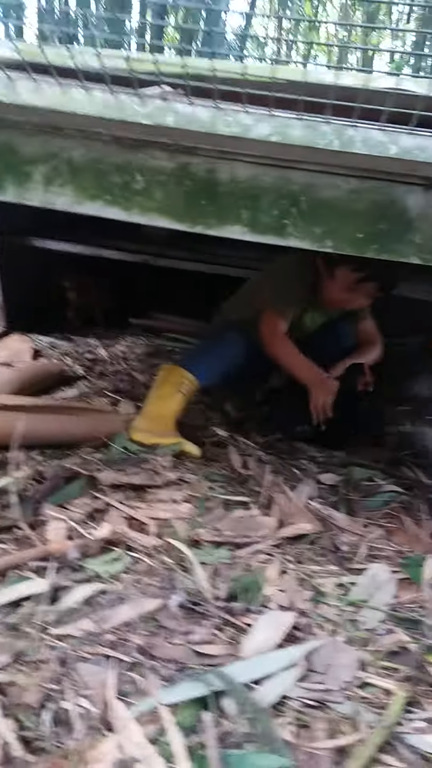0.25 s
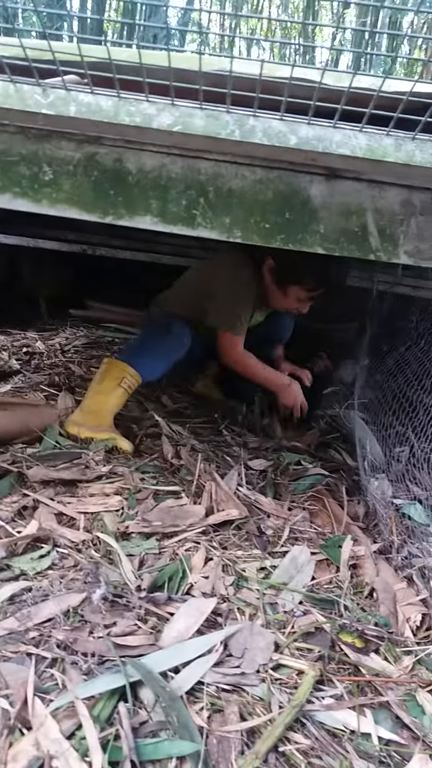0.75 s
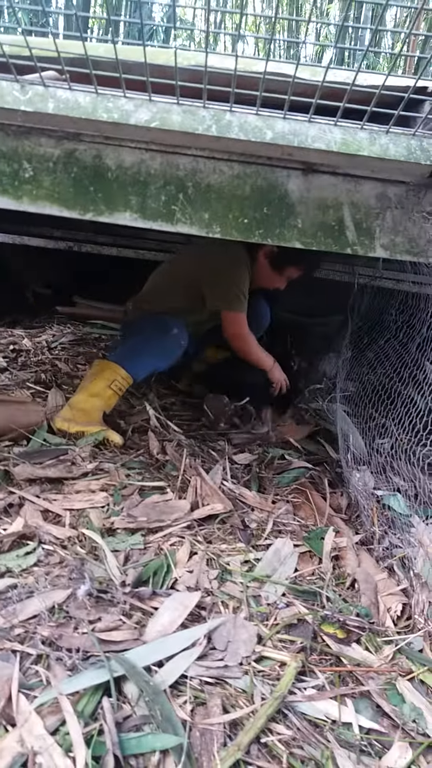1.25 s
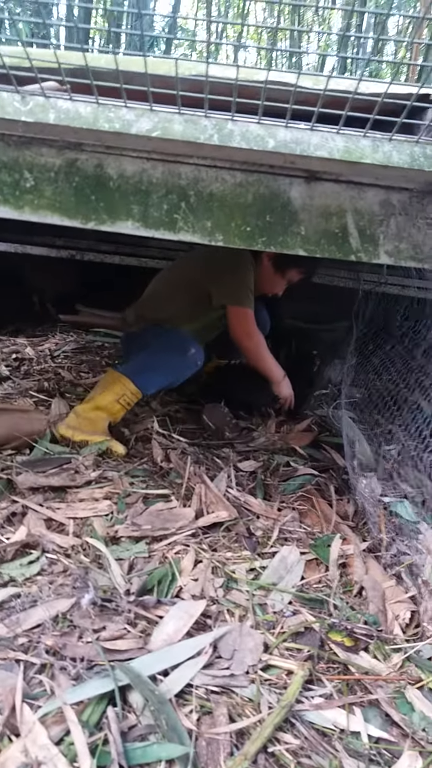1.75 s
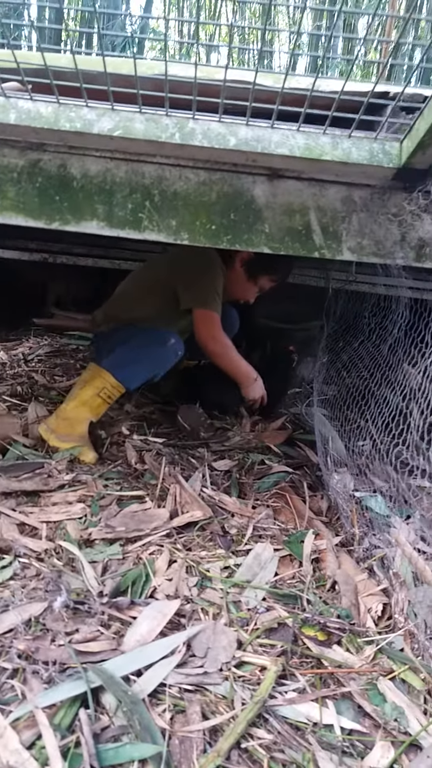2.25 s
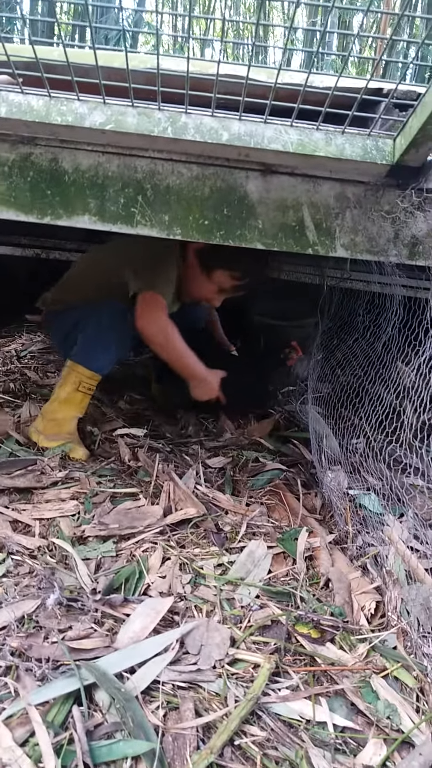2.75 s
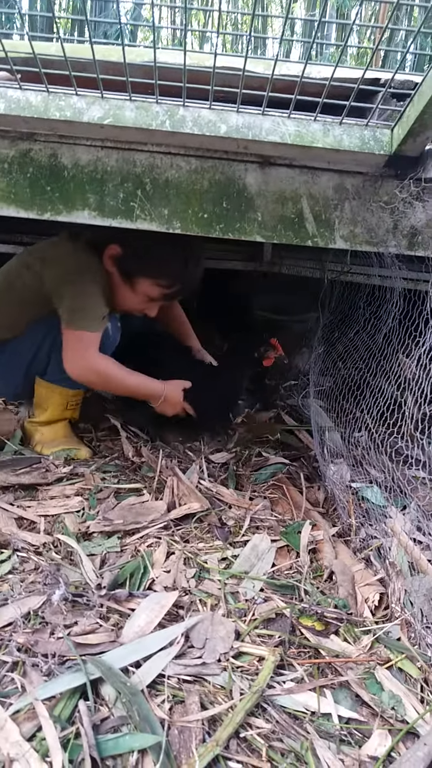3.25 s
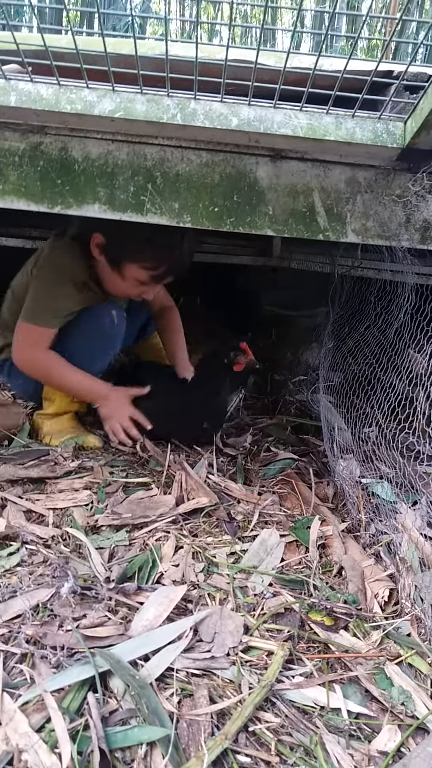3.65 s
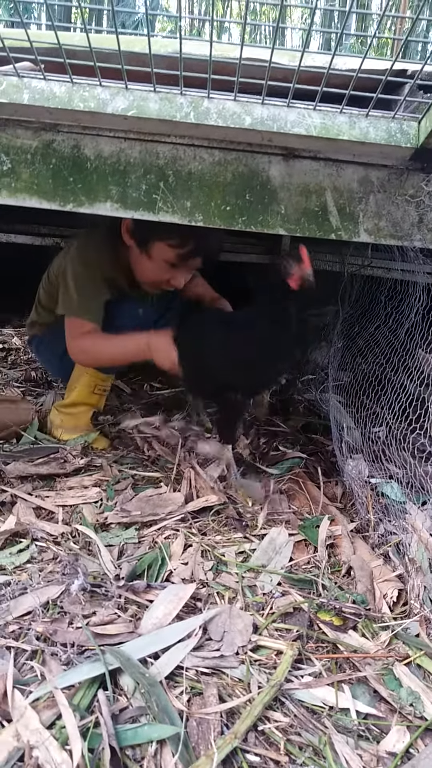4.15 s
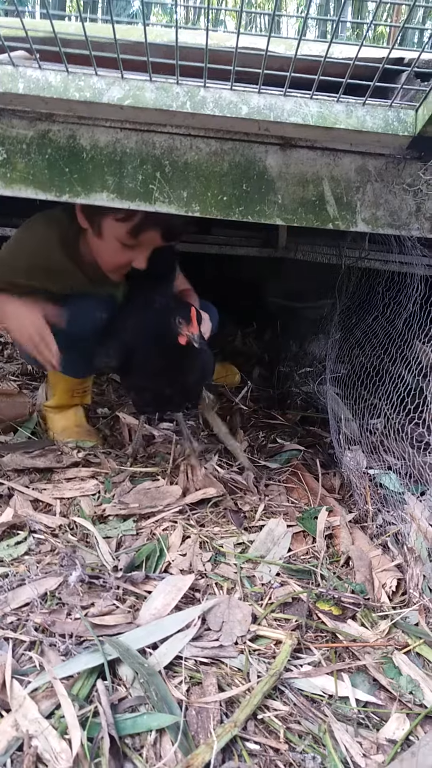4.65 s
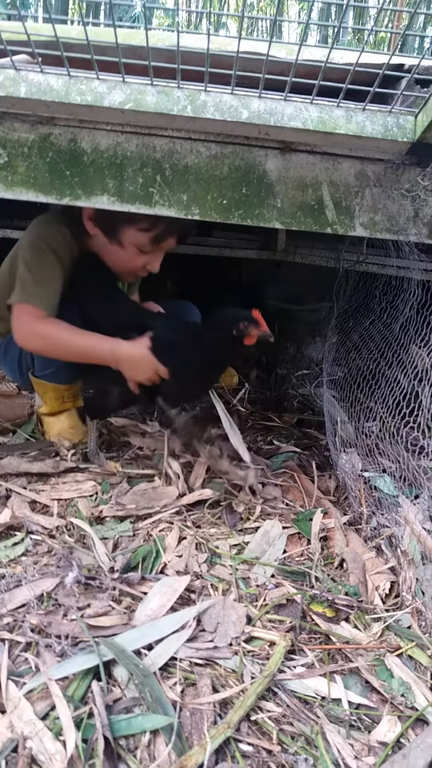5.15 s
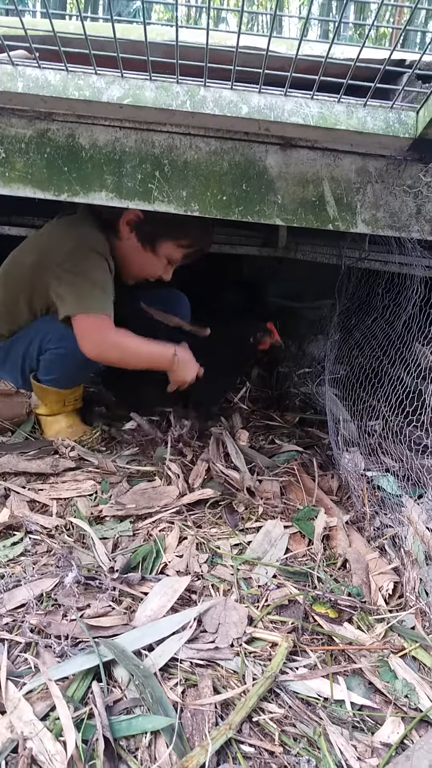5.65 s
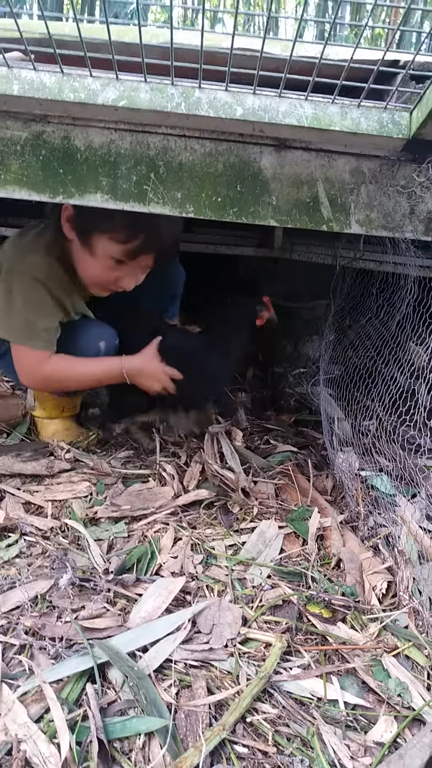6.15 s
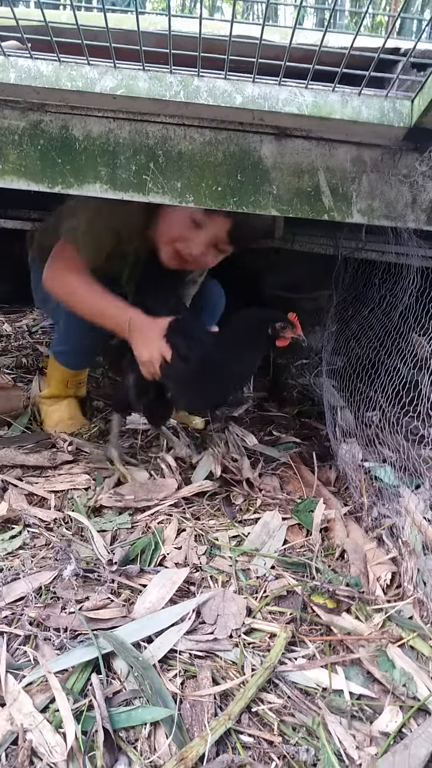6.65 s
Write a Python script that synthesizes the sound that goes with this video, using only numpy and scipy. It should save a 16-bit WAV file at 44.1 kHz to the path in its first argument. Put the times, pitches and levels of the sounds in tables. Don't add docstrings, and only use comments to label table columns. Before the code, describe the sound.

A hen being grabbed cries out sharply at once, already mid-squawk, then sounds tired and raspy with quiet gaps. A burst of harsh barks and one more clear squawk follows after four seconds, trailing into broken muttering. Leaf litter crackles under feet and hands, faint birds glide downward in pitch, low clucks sit behind. Near, essentially mono outdoor pickup, with a short dull boxy echo from the boards.

```python
import sys
import numpy as np
from scipy import signal
from scipy.fft import rfft, irfft, next_fast_len
from scipy.io import wavfile
from scipy.ndimage import uniform_filter1d

SR = 44100
rng = np.random.default_rng(int(sys.argv[2]) if len(sys.argv) > 2 else 0)


def dump(signal):
    limited = np.clip(np.atleast_2d(signal).T, -1, 1)
    pcm = np.round(limited * 32767).astype(np.int16)
    wavfile.write(sys.argv[1], SR, pcm)


def decibels_to_gain(level_db):
    exponent = np.asarray(level_db, float) / 20
    return 10 ** exponent


N = 304290


def rms_one(x):
    return x / np.sqrt(np.mean(x ** 2) + 1e-20)


def coloured(x, points):
    size = next_fast_len(len(x))
    hz = np.maximum(np.fft.rfftfreq(size, 1 / SR), 1)
    points = np.array(points)
    gain_db = np.interp(np.log(hz), np.log(points[:, 0]), points[:, 1])
    return irfft(rfft(x, size) * decibels_to_gain(gain_db), size)[:len(x)]


def drift(count, rate_hz):
    r = np.exp(-2 * np.pi * rate_hz / SR)
    slow = signal.lfilter([1], [1, -2 * r, r * r], rng.standard_normal(count + SR // 4))
    return rms_one(slow)[SR // 4:]


def resonance(x, hz, width_hz):
    r = np.exp(-np.pi * width_hz / SR)
    zeros = np.array([1, 0, -1]) * (1 - r * r) / 2
    return signal.lfilter(zeros, [1, -2 * r * np.cos(2 * np.pi * hz / SR), r * r], x)


def steep_resonance(x, hz, width_hz):
    return resonance(resonance(x, hz, width_hz), hz, width_hz)


def band(x, low_hz, high_hz):
    return signal.sosfilt(signal.butter(2, [low_hz, high_hz], "band", fs=SR, output="sos"), x)


def add(out, s, sound):
    i = max(round(s * SR), 0)
    out[i:i + len(sound)] += sound[:N - i]


def hump(length_s, rise):
    u = np.arange(round(length_s * SR)) / (length_s * SR)
    rise = np.clip(rise, .02, .9)
    return np.sin(np.pi / 2 * np.minimum(u / rise, (1 - u) / (1 - rise))) ** 2


def tract(source, modes):
    out = 0
    for k, (hz, width_hz, level_db) in enumerate(modes):
        gain = decibels_to_gain(level_db + 2.7 * drift(len(source), 21.3))
        out = out + (-1) ** k * gain * resonance(resonance(source, hz, width_hz), hz, 2 * width_hz)
    return out


def opened(modes, gains_db):
    return [(hz, width_hz, db + more_db) for (hz, width_hz, db), more_db in zip(modes, gains_db)]


# centre in Hz, width in Hz, level in dB.
SHRILL_MODES = [(7990, 1100, 3.5), (9700, 2500, -11), (13000, 1900, -30)]
OPEN_HZ, THROAT_WIDTH_HZ, CLOSED_WIDTH_HZ = 1486, 370, 312
THROB_HZ, SHARP_CUT_HZ = 53, 8200
TOP_AIR = .12


def squawk(rows, rough, throb, fundamental_db, windpipe_db, sharp_db, windpipe, sharp, shrill_db,
           closed_hz, air, spread, top_lag):
    s, pitch, level_db, open_db = np.transpose(rows)
    t = np.arange(s[0], s[-1], 1 / SR)
    level_db, open_db = np.interp(t, s, level_db), np.interp(t, s, open_db)
    below_peak_db = level_db.max() - level_db
    rough = np.clip(rough + (0.0061 + 0.047 * rough) * below_peak_db, 0, 1)
    glide = uniform_filter1d(np.interp(t, s, pitch), size=500)
    jitter = 1 + 0.0718 * rough * drift(len(t), 143.0) + 0.0028 * drift(len(t), 59.0)
    cycles = np.cumsum(glide * jitter) / SR
    pulses = sum(np.cos(2 * np.pi * k * cycles - .45 - spread * k ** 2) for k in range(1, 29))
    luck = np.clip(rng.standard_normal(int(cycles[-1]) + 2), -3, 1.3)
    strength = decibels_to_gain(5.0 * rough * luck[(cycles + .5).astype(int)])
    breath = rng.standard_normal(len(t)) * (1 + np.cos(2 * np.pi * cycles))
    source = rms_one(pulses) * strength + 1.25 * rough * breath
    upper = source + air * breath
    hissing = upper + TOP_AIR * decibels_to_gain(4.5 * drift(len(t), 25.0)) * breath
    lowest_top_hz = 1.35 * pitch.max()
    layers = [band(band(source, 230, lowest_top_hz), 230, lowest_top_hz),
              steep_resonance(source, closed_hz, CLOSED_WIDTH_HZ),
              steep_resonance(source, OPEN_HZ, THROAT_WIDTH_HZ),
              tract(upper, windpipe),
              band(tract(hissing, sharp), 2500, SHARP_CUT_HZ),
              tract(hissing, SHRILL_MODES),
              band(breath, 192, 284)]
    rest = np.maximum(1 - sum(decibels_to_gain(2 * db) for db in (open_db, fundamental_db)), .03)
    forced = np.minimum(decibels_to_gain(3 * (sharp_db + 13)) + 3 * rough.min(), 1)
    shrill = decibels_to_gain(sharp_db + shrill_db - 8.5) * forced
    loudest_db = np.maximum.accumulate(level_db)
    wait_db = level_db.max() - loudest_db
    lead = decibels_to_gain(0.38 * wait_db)
    fading = lead * decibels_to_gain(0.82 * (level_db - loudest_db))
    top = fading * decibels_to_gain(-top_lag * wait_db)
    gains = [decibels_to_gain(fundamental_db) * lead, -np.sqrt(rest), decibels_to_gain(open_db), -decibels_to_gain(windpipe_db) * fading,
             decibels_to_gain(sharp_db) * top, shrill * top, decibels_to_gain(-17) * rough]
    voice = sum(g * rms_one(x) for g, x in zip(gains, layers))
    beat = np.cos(2 * np.pi * THROB_HZ * (t - s[0] - .008) + 0.96 * drift(len(t), 37.0))
    throbbing = rms_one(np.maximum(1 + 0.75 * throb * beat, .06))
    edge = np.minimum(1, np.minimum(t - s[0] + (s[0] == 0), s[-1] - t) / 0.0023)
    return -voice * decibels_to_gain(level_db) * edge * throbbing


# time in seconds, pitch in Hz, level in dB,
# open-beak resonance in dB against the level.
CLEAR_CALLS = [
    [(0, 535, -17, -2.5), (0.05, 534.4, -19, 2), (0.095, 551.4, -18, -3.5), (0.11, 523, -23.5, 2.5),
     (0.124, 429, -25.5, -20), (0.14, 390, -67, -5)],
    [(0.236, 491.4, -42, -7), (0.246, 542, -18, -3), (0.268, 550.3, -15.5, -3), (0.295, 528.5, -16.5, 0),
     (0.318, 465, -23.5, -4), (0.342, 416, -42, -21)],
    [(0.44, 514, -66, 4), (0.456, 553, -25, -4.5), (0.48, 567, -20, 1.5), (0.51, 573.4, -21, -0.5),
     (0.535, 524, -25.5, -5.5), (0.558, 411, -38.5, -25)],
    [(0.656, 499.5, -44, -11), (0.672, 547.4, -31.5, 2.5), (0.692, 532, -22.5, 5), (0.71, 520, -26, -5.5),
     (0.762, 510.3, -24, 2), (0.788, 480, -35.5, -11)],
    [(4.612, 465, -48, -8), (4.62, 473, -36.5, -38), (4.655, 492, -18.5, -44), (4.685, 504.5, -22, -13),
     (4.712, 496.4, -23.5, -2), (4.726, 482, -30.5, -14), (4.742, 437, -33, -19)],
]
# roughness 0-1, throb depth 0-1, fundamental in dB, windpipe in dB,
# sharp top in dB.
CLEAR_COLOUR = [(0.07, 0, -8.5, -2, -4), (0.17, 0.4, -9.5, -5.5, -7), (0.07, 0.14, -4, -4.5, -6),
                (0.06, 0.02, -3, -8, -13), (0, 0.04, -14, -12.5, -14)]
# three windpipe gains in dB,
# three sharp gains in dB, shrill in dB, closed-beak resonance in Hz.
CLEAR_OPENINGS = [(5.5, -3, 0.22, -2, -0.7, 0, 1, 1060), (7.5, 2.5, 0.2, -4, -5.5, 2, 1, 1037),
                  (-2, -3.5, 0.74, -0.5, -7, 1, 1, 960), (-15, 5, 1, -14, 2, -2, 3.5, 1090),
                  (10, -2.5, 1.8, 10, 8, 0.43, -21, 1036)]
CLEAR_TOP_WAIT = [.57, .57, 0.57, 0.81, .05]
# centre in Hz, width in Hz, level in dB.
CLEAR_WINDPIPE = [(2200, 500, -4), (2680, 1000, -1.5), (3770, 770, 1)]
# centre in Hz, width in Hz, level in dB.
CLEAR_SHARP = [(4240, 1200, 5.5), (5430, 1120, 4.5), (6920, 1060, 4.5)]


def clear_squawks():
    out = np.zeros(N)
    for rows, colour, opening, top_lag in zip(CLEAR_CALLS, CLEAR_COLOUR, CLEAR_OPENINGS, CLEAR_TOP_WAIT):
        *gains_db, shrill_db, closed_hz = opening
        windpipe, sharp = opened(CLEAR_WINDPIPE, gains_db[:3]), opened(CLEAR_SHARP, gains_db[3:])
        add(out, rows[0][0], squawk(rows, *colour, windpipe, sharp, shrill_db, closed_hz,
                                    air=.07, spread=0.12, top_lag=top_lag))
    return out


ONSET_OVERSHOOT = 0.057
BEAK_AT_START, BEAK_AT_END = 0.94, 0.89


def call(start_s, length_s, hz, peak_db, open_db, breath):
    attack_s, release_s, droop, start_db, end_db, sag = breath
    hold_s = max(length_s - attack_s - release_s, .001)
    s = np.array([0, attack_s, attack_s + hold_s, max(length_s, attack_s + hold_s + .005)])
    pitch = hz * (1 + ONSET_OVERSHOOT * (s == 0)) - sag * (s - length_s / 2)
    level_db = peak_db - droop * hold_s * np.array([0, 0, 1, 1]) + [start_db, 0, 0, end_db]
    beak_db = open_db * np.array([BEAK_AT_START, 1, 1, BEAK_AT_END])
    return np.transpose([start_s + s, pitch, level_db, beak_db])


# start in seconds, length in seconds, pitch in Hz, peak in dB, open beak in dB.
TIRED_CALLS = [
    (0.958, 0.057, 520.7, -34, -4.5),
    (1.279, 0.16, 548.8, -33, -5),
    (1.658, 0.072, 492, -36.5, -4.5),
]
CHATTER_CALLS = [
    (2.743, 0.046, 458, -36.5, -1.5),
    (3.228, 0.035, 484.5, -35.5, 2),
    (3.323, 0.045, 510, -31, -5),
    (3.669, 0.043, 439.5, -29.5, -6),
    (4.016, 0.043, 397, -40, -6),
]
BARK_CALLS = [
    (4.164, 0.039, 512.6, -20, -15),
    (4.237, 0.044, 505.3, -19.5, -52),
    (4.31, 0.0468, 494, -23.5, -55),
    (4.495, 0.048, 475.3, -20.5, -4),
]
YAP_CALLS = [
    (4.898, 0.067, 461.6, -21.5, -7),
    (4.963, 0.063, 458, -24, -17),
    (5.265, 0.032, 432, -22, -3),
    (5.376, 0.066, 436, -28, -11.5),
]
MOAN_CALLS = [
    (4.533, 0.081, 402.5, -39, -42),
]
MUTTER_CALLS = [
    (5.331, 0.05, 418, -37.5, -5.5),
    (5.678, 0.062, 481.6, -27, -6),
    (5.773, 0.062, 430.3, -29, -12),
    (6.308, 0.049, 482, -34.5, -3.5),
    (6.386, 0.089, 500, -34.5, -4),
    (6.47, 0.055, 416, -34, 1),
]
RATTLE_CALLS = [
    (2.423, 0.101, 518.6, -42, -0.5),
    (2.528, 0.065, 490.5, -40.5, -5.5),
]
GROAN_CALLS = [
    (1.927, 0.078, 436.6, -42.5, -48),
    (3.792, 0.052, 405.4, -35, -15),
]
WHEEZE_CALLS = [
    (3.846, 0.14, 368, -48, -1.3),
    (6.536, 0.126, 384.4, -49.5, -1.4),
]
# roughness 0-1, throb depth 0-1, fundamental in dB, windpipe in dB at open beak,
# sharp top in dB.
KIND_VOICES = [
    (0.2, 0.39, -3, 1.5, -12),
    (0.64, 0.2, -3.5, -4.5, -24.5),
    (0.39, 0.15, -9.5, -13, -21.5),
    (0.62, 0.1, -6, -9.5, -22),
    (0.11, 0.05, 11, -19, -23),
    (0.47, 0.15, -4, -4, -21),
    (0.55, 0.2, -2, -6.5, -32),
    (0.79, 0.36, -9, -7.5, -20.5),
    (0.63, 0.63, -19, -46, -34),
]
# attack in seconds, release in seconds, hold droop in dB per second,
# start in dB, end in dB, pitch sag in Hz per second.
KIND_BREATHS = [(0.0123, 0.03, 68, -16, -11.5, 595), (0.011, 0.019, 45, -7, -21, 288),
                (0.0109, 0.013, -27, -10, -10.5, 489), (0.0086, 0.014, 38, -10, -14, 479),
                (0.006, 0.05, 54, -2, -15, 712), (0.0139, 0.025, 48, -5.5, -23.5, 398),
                (0.008, 0.023, 2, 1, -13, 294), (0.031, 0.038, 8.5, -18, -16, -200),
                (0.0085, 0.07, 43, -5, -5.5, 40)]
# windpipe in dB, sharp top in dB,
# closed-beak resonance in Hz.
NECK_POSTURE = [(1.5, 0, 720), (-2.5, 2.5, 970), (5.5, -0.5, 720), (-2.5, -6, 1010), (0, -7, 900),
                (0, -3, 940), (-0.5, 4.5, 940), (0.5, 2, 780), (1, -0.5, 960), (-1, -0.5, 985), (1, 2, 954),
                (1.5, 7, 895), (-1.5, 0.5, 1050), (-8, 5, 990), (-1.5, 2, 980), (3.5, -3.5, 897),
                (5, -2, 1100), (-8, -5, 940), (1.5, 4, 950), (0.5, -9, 970), (2.5, 3, 890), (1.5, -1, 880),
                (-2.5, 2, 690), (1.5, -6, 740), (-1, 4, 900), (-0.5, -7, 760), (-1, 2.5, 960), (0, 0, 550),
                (3, 2, 650)]
# windpipe high over low in dB, sharp high over low in dB,
# shrill in dB.
UPPER_LEAN = [(2, 2, 7), (3, 2.5, 0), (2, -2, 3), (-2, 0, -1.5), (-4, 0, -1.5), (-2.5, 0, 4),
              (-3.5, 0, 4.5), (5, 0, -1.5), (8, -6, -1), (4, 6, -1), (1.5, -2.5, -7), (7, -1, 3),
              (1, -5.5, 2), (8, -1.5, -2), (-1, -4, 1), (3.5, 0, 1), (-2, 1, 0), (2, 0, -1.5),
              (-1.5, -3, -1), (1.5, -1.5, 5), (-2, 2, 4), (-1, 6, -1.5), (-2, 5, -1.5), (-2, -2, -1.5),
              (-4, 0, -1.5), (-1, 0, -1.5), (3, 0, 3), (0, 0, -1.5), (0, 0, -1.5)]
# centre in Hz, width in Hz, level in dB.
HOARSE_TOP = [(4900, 1330, 0.5), (5700, 950, 1), (6570, 830, 0)]
# centre in Hz, width in Hz, level in dB.
HOARSE_PIPE = [(2335, 1180, -8), (2870, 1270, -3), (3695, 425, -1)]


def short_calls():
    out = np.zeros(N)
    kinds = [TIRED_CALLS, CHATTER_CALLS, BARK_CALLS, YAP_CALLS, MOAN_CALLS, MUTTER_CALLS, RATTLE_CALLS,
             GROAN_CALLS, WHEEZE_CALLS]
    necks = zip(NECK_POSTURE, UPPER_LEAN)
    for kind, voice, breath in zip(kinds, KIND_VOICES, KIND_BREATHS):
        rough, throb, fundamental_db, windpipe_db, sharp_db = voice
        air = .18 if kind is TIRED_CALLS else .48
        for row, (posture, lean) in zip(kind, necks):
            pipe_db, top_db, closed_hz = posture
            pipe_lean, sharp_lean, shrill_db = lean
            pipe_level_db = windpipe_db + pipe_db + 0.2 * row[-1]
            windpipe = opened(HOARSE_PIPE, [-pipe_lean, 0, pipe_lean])
            sharp = opened(HOARSE_TOP, [-sharp_lean, 0, sharp_lean])
            add(out, row[0], squawk(call(*row, breath), rough, throb, fundamental_db, pipe_level_db,
                                    sharp_db + top_db, windpipe, sharp, shrill_db, closed_hz,
                                    air=air, spread=0.027, top_lag=0.89))
    return out


# middle in seconds, length in
# seconds, change in dB.
THROAT_CATCHES = [(1.29, 0.032, -12), (1.367, 0.023, -7), (1.671, 0.016, -4.5), (0.957, 0.01, -4),
                  (2.433, 0.017, -14), (2.451, 0.015, -9), (2.471, 0.011, -9), (2.49, 0.012, -15),
                  (2.506, 0.012, -18), (2.529, 0.0092, -8), (2.543, 0.0093, -10), (2.56, 0.011, -14),
                  (4.181, 0.027, -4.5), (3.248, 0.0075, 2), (5.689, 0.0082, -2), (5.391, 0.011, 3),
                  (4.248, 0.0045, -8), (4.329, 0.015, -4), (4.521, 0.0097, -1), (4.916, 0.008, -3.5),
                  (4.944, 0.015, -3.5), (4.96, 0.0089, -5), (4.975, 0.0071, -9), (5.0, 0.0095, 1),
                  (5.424, 0.0086, -0.5), (5.707, 0.0072, 0), (5.786, 0.0075, -2), (3.338, 0.016, -7),
                  (5.266, 0.021, -2.5), (6.308, 0.015, -5), (6.405, .012, -6), (6.444, 0.0091, -16),
                  (6.476, 0.012, -7), (6.484, 0.018, -21)]


def catches():
    closure_db = np.zeros(N)
    for s, length_s, depth_db in THROAT_CATCHES:
        add(closure_db, s - length_s / 2, depth_db * hump(length_s, 0.7))
    return decibels_to_gain(closure_db)


# time in seconds, peak in dB, ring in Hz.
THROAT_TICKS = [(0.222, -34, 1150), (0.937, -40, 1200), (1.634, -48.5, 1336), (2.992, -47, 5170),
                (3.212, -34, 1350), (3.304, -36.5, 1160), (3.658, -49, 1020), (4, -35.5, 1525),
                (4, -35, 860), (4.13, -32, 1165), (4.293, -49, 1500), (4.724, -33.5, 1130),
                (4.79, -45, 1030), (4.872, -45, 1480), (5.305, -44, 895), (2.466, -41.5, 780),
                (1.283, -40, 950), (1.285, -44.5, 1850), (4.528, -22.5, 1340), (4.189, -28, 1250),
                (.272, -17.5, 1190), (.334, -47, 1110), (0.443, -28.5, 1100), (0.657, -31.5, 1210),
                (4.29, -31.5, 890), (4.461, -35, 954), (4.868, -29, 1130), (5.046, -49.5, 1180),
                (5.126, -48, 1500), (5.169, -47.5, 855), (5.252, -32, 1000), (5.657, -34.5, 1410),
                (5.744, -41, 1600), (6.268, -47, 1170), (6.365, -47, 1320), (4.625, -60, 9700),
                (4.725, -59, 9300), (4.727, -62, 11500)]


def throat_ticks():
    out = np.zeros(N)
    for s, peak_db, hz in THROAT_TICKS:
        air = rng.standard_normal(SR // 10)
        narrow = resonance(air, hz, max(170.0, .06 * hz))
        ring = rms_one(resonance(narrow, hz, max(490.0, .1 * hz)))
        ring = ring + decibels_to_gain(-16.5) * rms_one(tract(air, HOARSE_PIPE))
        shape = hump(.024, .3)
        add(out, s - .004, decibels_to_gain(peak_db + 1.5) * shape * ring[-len(shape):])
    return out


def hen():
    return (clear_squawks() + short_calls()) * catches() + throat_ticks()


RING_HZ, RING_WIDTH_HZ, RING_T60_S, RING_DB = 1600, 1070, 0.33, -34


def coop(x):
    t = np.arange(SR // 3) / SR
    tail = band(rng.standard_normal(len(t)), 520, 6100) * decibels_to_gain(-60 * t / 0.054) * (t > .006)
    ring = resonance(rng.standard_normal(len(t)), RING_HZ, RING_WIDTH_HZ)
    ring = ring * decibels_to_gain(-60 * t / RING_T60_S) * (t > .01)
    echo = decibels_to_gain(-16.0) * tail / np.linalg.norm(tail) + decibels_to_gain(RING_DB) * ring / np.linalg.norm(ring)
    return signal.fftconvolve(x, echo)[:N]


# time in seconds, level in dB.
LEAF_STIR = [(0.0, -51.5), (0.25, -46), (0.48, -55), (1.06, -51), (1.58, -57.5), (1.75, -63), (2.23, -67),
             (2.56, -59), (2.95, -60.5), (3.2, -50.5), (3.61, -61.5), (4.191, -52.5), (4.4, -58),
             (5.4, -54.5), (5.8, -65), (6.28, -61), (6.44, -50), (6.75, -61)]
# start in seconds, length in seconds, level in dB.
LEAF_SCUFFS = [(1.056, 0.031, -51), (1.236, 0.014, -61.5), (1.466, 0.045, -57.5), (1.61, 0.032, -63),
               (2.352, 0.042, -62), (2.675, 0.044, -61.5), (2.874, 0.088, -64.5), (3.05, 0.047, -60.5),
               (5.518, 0.15, -70.5), (5.731, 0.022, -55), (4.036, 0.023, -63.5), (3.145, 0.013, -54.5),
               (3.57, 0.089, -57.5), (4.567, 0.014, -54.5), (5.125, 0.012, -55), (5.153, 0.027, -59),
               (6.179, 0.015, -68.5), (6.25, 0.047, -60)]
# frequency in Hz, level in dB per Hz.
LEAF_SPECTRUM = [(120, -40.5), (200, 0.5), (554, -8.5), (1620, -7.5), (2020, -13.5), (3480, -8),
                 (6020, -14), (7220, -19), (15500, -28.5)]
# time in seconds, peak in dB.
TWIG_SNAPS = [(0.606, -33.5), (0.835, -42), (1.066, -20.5), (4.028, -48), (4.123, -51), (4.224, -54),
              (1.2373, -40), (1.479, -29.5), (1.9001, -53), (2.9923, -29), (3.1477, -54), (3.4087, -46),
              (5.047, -31), (5.8354, -47), (6.393, -27.5), (6.4744, -55)]


def leaves():
    s, level_db = np.transpose(LEAF_STIR)
    sizes = decibels_to_gain(4.5 * np.minimum(rng.exponential(1, N), 5)) * rng.choice([-1, 1], N)
    grains_per_s = 3000 * decibels_to_gain(4.0 * drift(N, 18.))
    grains = sizes * (rng.random(N) < grains_per_s / SR)
    rustle = coloured(rms_one(grains) + 1.13 * rng.standard_normal(N), LEAF_SPECTRUM)
    stir = decibels_to_gain(np.interp(np.arange(N) / SR, s, level_db) - 6.0)
    for s, length_s, level_db in LEAF_SCUFFS:
        add(stir, s, decibels_to_gain(level_db) * hump(2.1 * length_s, 0.29))
    out = rustle / np.std(band(rustle, 4550, 13000)) * stir
    for s, peak_db in TWIG_SNAPS:
        shape = hump(0.02, 0.055)
        crack = rms_one(band(rng.standard_normal(len(shape)), 2600, 6800))
        add(out, s, decibels_to_gain(peak_db - 15.5) * shape * crack)
        shape = hump(.004, .1)
        click = rms_one(band(rng.standard_normal(round(.004 * SR)), 8000, 16000))
        add(out, s, decibels_to_gain(peak_db - 24) * shape * click)
    return out


# peak in seconds, length in seconds, level in dB.
GUSTS = [(0.207, 0.44, -49), (0.797, 0.78, -59.5), (1.602, 0.73, -60), (2.387, 0.16, -55.5),
         (3.108, 0.46, -44.5), (3.813, 0.39, -57), (4.96, 0.8, -59.5), (5.396, 0.63, -56),
         (1.851, 0.43, -74), (3.49, 0.45, -60), (.5, 0.25, -67)]
# frequency in Hz, level in dB per Hz.
WOODLAND = [(18, -43.5), (30, -53), (43, 8.5), (108, 12.5), (645, -2.5), (1680, -2), (1840, 3.5),
            (2080, -9.5), (3360, -6.5), (4610, -32.5), (5830, -6), (7200, -37), (10700, -13),
            (15800, -20.5)]
WOODLAND_DB, CALM_DB, GUST_RISE = -62.5, -64.5, 0.47


def background():
    wind = np.full(N, decibels_to_gain(CALM_DB))
    for s, length_s, level_db in GUSTS:
        add(wind, s - GUST_RISE * length_s, decibels_to_gain(level_db) * hump(length_s, GUST_RISE))
    air = rms_one(band(rng.standard_normal(N), 55, 152.6)) * wind * decibels_to_gain(1.0 * drift(N, 24.0))
    hiss = rms_one(coloured(rng.standard_normal(N), WOODLAND))
    return air + decibels_to_gain(WOODLAND_DB + 0.54 * drift(N, 7.4)) * hiss


# middle in seconds, length in seconds, level in dB.
WING_PUFFS = [(0.157, 0.04, -37), (0.573, 0.067, -39), (0.832, 0.023, -49.5), (1.085, 0.05, -41),
              (1.56, 0.05, -41.5), (1.97, 0.026, -49), (4.02, 0.042, -41), (2.368, 0.046, -52),
              (3.02, .05, -45), (3.617, 0.042, -40), (4.776, 0.029, -51), (6.197, 0.0065, -51)]


def wings():
    out = np.zeros(N)
    for s, length_s, level_db in WING_PUFFS:
        shape = hump(1.5 * length_s, 0.42)
        gust = rms_one(band(rng.standard_normal(SR // 5), 190, 910))
        add(out, s - 0.61 * length_s, decibels_to_gain(level_db) * shape * gust[-len(shape):])
    return out


# start in seconds, length in seconds, first pitch in Hz,
# last pitch in Hz, level in dB.
HOOKED_WHISTLES = [
    (1.93, 0.082, 4850, 3230, -54.5),
    (2.135, 0.093, 5100, 3210, -54.5),
    (2.927, 0.09, 4760, 3080, -55),
    (4.386, 0.077, 4660, 3050, -50),
    (6.574, 0.095, 4200, 3120, -55),
    (3.479, 0.104, 5690, 2960, -58.5),
    (3.413, 0.225, 3390, 2090, -55.5),
]
# start in seconds, length in seconds, first pitch in Hz,
# last pitch in Hz, level in dB.
SLIDING_WHISTLES = [(2.147, 0.047, 3610, 2810, -55.5), (2.205, 0.068, 4290, 2810, -60.5),
                    (2.269, 0.034, 3310, 2740, -63.5), (2.292, .026, 1480, 1010, -58),
                    (2.109, 0.05, 2620, 2350, -68), (2.351, 0.031, 3360, 2910, -58.5),
                    (3.132, 0.057, 3490, 2600, -54), (3.284, 0.059, 4120, 3010, -51),
                    (1.461, 0.064, 3990, 2510, -57), (1.241, .021, 2610, 2990, -53),
                    (4.842, 0.1, 3170, 2500, -49.5), (5.829, 0.082, 3830, 2270, -62.5),
                    (6.655, 0.058, 3250, 2550, -60.5), (6.791, 0.032, 3590, 2980, -63.5)]
# start in seconds, length in seconds, first pitch in Hz, last pitch in Hz, level in dB.
RISING_CHIRPS = [
    (4.83, 0.018, 2200, 3150, -52),
    (6.68, 0.074, 1420, 2390, -55.5),
    (6.745, 0.033, 2270, 2380, -58),
    (6.825, 0.074, 1840, 2280, -59),
]
HOOK_BEND, SLIDE_BEND, CHIRP_BEND = 3.2, 1.5, 3.8


def birds():
    out = np.zeros(N)
    notes = [(*n, HOOK_BEND) for n in HOOKED_WHISTLES]
    notes += [(*n, SLIDE_BEND) for n in SLIDING_WHISTLES]
    notes += [(*n, CHIRP_BEND) for n in RISING_CHIRPS]
    for s, length_s, first_hz, last_hz, level_db, bend in notes:
        shape = hump(length_s, .3) ** .45
        left = np.linspace(1, 0, len(shape)) ** bend
        waver = 1 + .009 * drift(len(shape), 70.)
        flicker_db = 2.6 * drift(len(shape), 50.)
        cycles = np.cumsum((last_hz + (first_hz - last_hz) * left) * waver) / SR
        note = np.sqrt(2) * decibels_to_gain(level_db + flicker_db) * shape * np.sin(2 * np.pi * cycles)
        add(out, s, note)
        add(out, s + 0.0034, 0.5 * note)
    return out


# start in seconds, length in seconds, pitch in Hz, level in dB.
LOW_CLUCKS = [(2.349, 0.014, 166, -42), (3, 0.033, 180, -35), (3.065, 0.017, 125, -39),
              (3.033, 0.024, 285, -45), (1.943, 0.037, 310, -46), (3.787, 0.033, 308, -42.5),
              (4.018, 0.028, 199, -47), (5.038, 0.011, 207, -44), (5.27, 0.041, 251, -46.5),
              (6.556, 0.013, 199, -48), (4.77, 0.027, 199, -41), (5.18, 0.02, 156, -43.5),
              (5.499, 0.065, 285, -52), (6.261, 0.035, 181.3, -47), (6.683, 0.035, 197, -43.5),
              (6.749, 0.014, 228, -42.5)]


def clucks():
    out = np.zeros(N)
    for s, length_s, hz, level_db in LOW_CLUCKS:
        shape = hump(1.74 * length_s, 0.37)
        cycles = np.cumsum(hz * (1 + 0.03 * drift(len(shape), 59.0))) / SR
        tone = sum(decibels_to_gain(-7.0 * k) * np.sin(2 * np.pi * (k + 1) * cycles) for k in range(5))
        add(out, s, decibels_to_gain(level_db) * shape * tone)
    return out


def scene():
    near = hen() + wings() + birds() + clucks()
    return np.tile(near + coop(near) + leaves() + background(), (2, 1))


# start in seconds, low edge in Hz,
# high edge in Hz, level in dB.
NOISE_PATCHES = [
    (.025, 5700, 7630, -28.5),
    (.025, 9000, 12200, -47),
    (.487, 6460, 7650, -34),
    (3.925, 4700, 5800, -71),
    (2.095, 5700, 7600, -80),
    (2.28, 4700, 16000, -74),
    (5.92, 8260, 9700, -76),
]


def patched(x):
    for s, low_hz, high_hz, level_db in NOISE_PATCHES:
        shape = hump(.045, .5)
        noise = band(band(rng.standard_normal((2, len(shape))), low_hz, high_hz), low_hz, high_hz)
        span = slice(round(s * SR), round(s * SR) + len(shape))
        edges = signal.butter(3, [low_hz, high_hz], "band", fs=SR, output="sos")
        lost = signal.sosfiltfilt(edges, x[:, span])
        x[:, span] += shape * (np.sqrt(2) * decibels_to_gain(level_db) * rms_one(noise) - lost)
    return x


def roll_off(x):
    return signal.sosfilt(signal.butter(12, 16080, fs=SR, output="sos"), x)


def record(dry):
    mix = patched(.58 * np.tanh(dry / .58))
    mix = signal.sosfilt(signal.butter(8, 50, "high", fs=SR, output="sos"), mix)
    mix = signal.sosfilt(signal.cheby2(14, 50, 16230, fs=SR, output="sos"), mix)
    return roll_off(mix)


dry = scene()
out = record(dry)
dump(out)
```